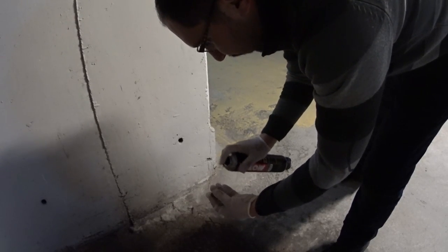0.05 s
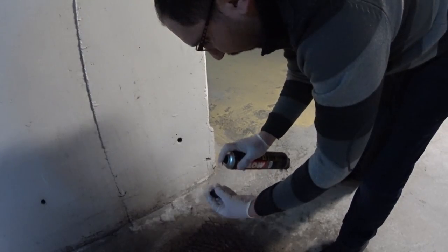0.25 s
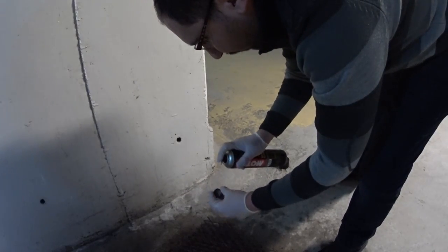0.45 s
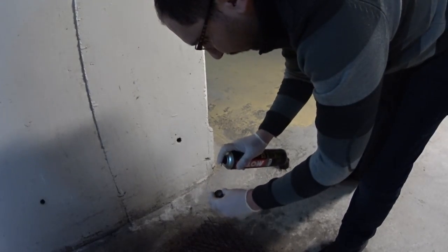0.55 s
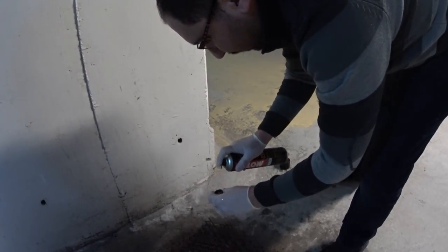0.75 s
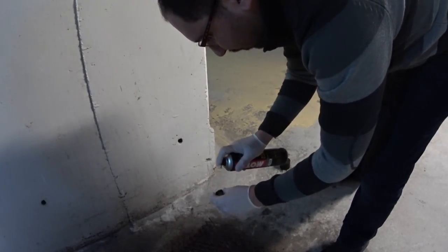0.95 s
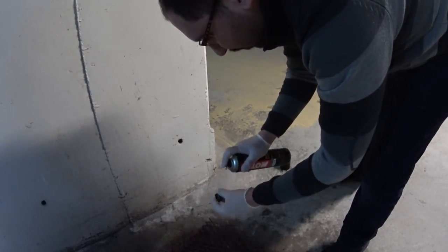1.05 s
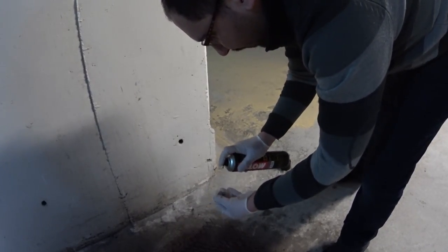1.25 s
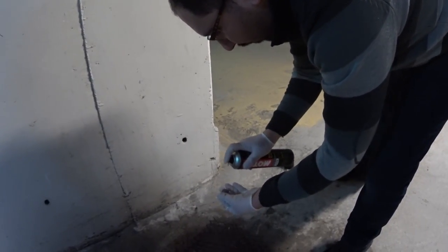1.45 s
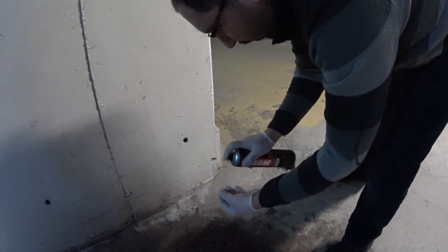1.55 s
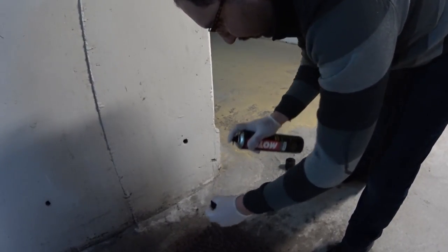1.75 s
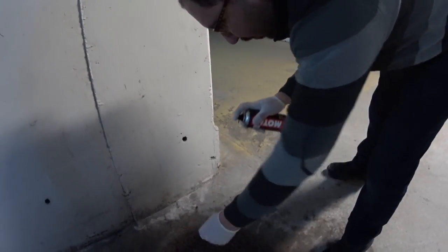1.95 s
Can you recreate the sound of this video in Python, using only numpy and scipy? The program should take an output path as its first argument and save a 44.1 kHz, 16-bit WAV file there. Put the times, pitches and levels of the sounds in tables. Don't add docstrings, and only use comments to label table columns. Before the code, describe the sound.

An aerosol can sprays a bright, sputtering hiss onto a small part, then shuts off abruptly

```python
import sys
import numpy as np
from scipy import signal
from scipy.fft import rfft, irfft, next_fast_len
from scipy.io import wavfile

SR = 44100
rng = np.random.default_rng(int(sys.argv[2]) if len(sys.argv) > 2 else 0)


def voltage_ratio(decibels):
    exponent = np.asarray(decibels, float) / 20
    return 10 ** exponent


def inscribe(sig):
    pcm = np.round(np.clip(np.atleast_2d(sig).T, -1, 1) * 32767)
    wavfile.write(sys.argv[1], SR, pcm.astype(np.int16))


N = 88200
RUN_IN = 44100

# columns pitch_hz, level_db (per Hz)
SPRAY_COLOUR = [(2000, -18.5), (3200, -3.5), (5800, -2), (8600, -4), (11000, -6), (13500, -9), (15700, -15)]


def at_hz(points, hz):
    p = np.array(points)
    return np.interp(np.log(np.maximum(hz, 1)), np.log(p[:, 0]), p[:, 1])


def scene_time():
    return (np.arange(N + RUN_IN) - RUN_IN) / SR


def in_time(rows):
    s, *columns = np.transpose(rows)
    t = scene_time()
    out = [np.interp(t, s, c) for c in columns]
    out[0] = out[0] - 45 * np.clip((t - s[-1]) / 0.033, 0, 1)
    return out


def rms_one(x):
    return x / np.sqrt(np.mean(x ** 2) + 1e-20)


def colour(x, points, slope_db=0):
    hz = np.maximum(np.fft.rfftfreq(x.shape[-1], 1 / SR), 1)
    octaves_below = np.maximum(np.log2(points[0][0] / hz), 0)
    octaves_above = np.maximum(np.log2(hz / points[-1][0]), 0)
    level_db = at_hz(points, hz) - slope_db * (octaves_below + octaves_above)
    return irfft(rfft(x) * voltage_ratio(level_db), x.shape[-1])


def resonance(x, hz, width_hz, state=None):
    r = np.exp(-np.pi * width_hz / SR)
    b = np.array([1, 0, -1]) * (1 - r * r) / 2
    a = [1, -2 * r * np.cos(2 * np.pi * hz / SR), r * r]
    if state is None:
        return signal.lfilter(b, a, x)
    return signal.lfilter(b, a, x, zi=state)


def drift(rate_hz):
    r = np.exp(-80 * np.pi * rate_hz / SR)
    white = rng.standard_normal((N + RUN_IN) // 40 + 2002)
    slow = signal.lfilter([1], [1, -2 * r, r * r], white)[2000:]
    return np.interp(np.arange(N + RUN_IN) / 40, np.arange(len(slow)), rms_one(slow))


def patchy(x, patchy_db, rate_hz):
    spec = rfft(x)
    third = np.log2(np.maximum(np.fft.rfftfreq(len(x), 1 / SR), 1) / 250) * 3
    third = np.clip(third, 0, 18)
    out = 0
    for k in range(19):
        part = irfft(spec * np.clip(1 - abs(third - k), 0, 1), len(x))
        out = out + part * voltage_ratio(patchy_db * drift(rate_hz))
    return out


def jet():
    # start_s, level_db
    flow = [
        (0, -44),
        (.05, -46),
        (.17, -46.5),
        (.52, -47.5),
        (1.0, -47),
        (1.39, -47.5),
        (1.52, -49.5),
        (1.555, -57.5),
    ]
    # pitch_hz, level_db (per Hz)
    jet_colour = [(335, -23.5), (365, -12), (715, -13), (950, -4.5), (1050, -9.5), (2100, -1.5), (3200, -7),
                  (6000, -7)]
    level_db, = in_time(flow)
    hiss = rms_one(colour(rng.standard_normal(N + RUN_IN), jet_colour, 17.3))
    return voltage_ratio(level_db - 1.54) * patchy(hiss, 1.0, 14.6)


def droplets(n):
    per_s, spread_db = 3000, 5
    sizes = voltage_ratio(spread_db * np.minimum(rng.exponential(1, n), 3.5)) * rng.choice([-1, 1], n)
    return rms_one(sizes * (rng.random(n) < per_s / SR))


def splash():
    # start_s, level_db, hollow pitch_hz, hollow strength_db
    strikes = [(0, -45.5, 6300, -14), (.124, -46.5, 5070, -3), (.24, -44, 5700, -9.5),
               (.32, -45.5, 5800, -6), (.39, -45, 5900, -5), (.46, -45, 6050, -7), (.6, -46, 6300, -6),
               (.7, -45.5, 4840, -14), (.8, -44.5, 4730, -13), (.9, -45.5, 6500, -12),
               (1.08, -46.5, 6500, -19), (1.2, -45, 7000, -6), (1.34, -45, 5760, -9),
               (1.45, -46.5, 6100, -0.5), (1.525, -44.5, 6160, -8), (1.553, -54, 6300, -22)]
    droplet_db, hollow_width_hz = -6.5, 1740
    level_db, hollow_hz, hollow_db = in_time(strikes)
    n = N + RUN_IN
    impacts = voltage_ratio(droplet_db) * droplets(n)
    hiss = rms_one(colour(rng.standard_normal(n) + impacts, SPRAY_COLOUR, 31))
    white, ring, state = rng.standard_normal(n), np.zeros(n), np.zeros((2, 2))
    for i in range(0, n, 128):
        once, state[0] = resonance(white[i:i + 128], hollow_hz[i], hollow_width_hz, state[0])
        ring[i:i + 128], state[1] = resonance(once, hollow_hz[i], hollow_width_hz, state[1])
    return voltage_ratio(level_db - 2.0) * patchy(hiss + voltage_ratio(hollow_db) * rms_one(ring), 1.6, 17.0)


def ringing_noise(white, hz, q):
    return rms_one(resonance(resonance(white, hz, hz / q), hz, hz / q))


def burst(s, length_s, hz, q):
    hiss_db = 1
    white, out = rng.standard_normal(16384), np.zeros(N + 2 * RUN_IN)
    hiss = voltage_ratio(hiss_db) * rms_one(colour(white, SPRAY_COLOUR, 12))
    t = (np.arange(16384) - 8192) / SR
    swell = np.exp(-.5 * (2.25 * t / length_s) ** 2)
    start = RUN_IN + int(s * SR) - 8192
    out[start:start + len(white)] = (ringing_noise(white, hz, q) + hiss) * swell
    return out[:N + RUN_IN]


def sputters():
    # start_s (the middle of the swell), length_s, level_db, pitch_hz, sharpness_q
    slugs = [(.005, 0.045, -57, 920, 1.2), (0.013, 0.042, -51, 7900, 1.5), (0.105, 0.075, -53.5, 5200, 4),
             (.255, 0.034, -49.5, 5900, 2.8), (0.419, 0.034, -46.5, 7060, 3), (0.76, 0.087, -53, 4720, 7),
             (1.081, 0.037, -50.5, 8500, 1.5), (1.144, 0.0253, -51, 5940, 1.9),
             (1.155, 0.075, -56.5, 3920, 19), (1.36, 0.12, -57, 4730, 9.9), (1.34, 0.045, -55, 5540, 6.0),
             (1.5, 0.067, -56.5, 3110, 6.0), (0.101, .06, -57, 4200, 12.0), (0.839, .05, -57, 3450, 8.0),
             (1.43, 0.078, -54, 7460, 5.0), (1.506, 0.038, -50, 6600, 2)]
    return sum(voltage_ratio(db) * burst(s, length_s, hz, q) for s, length_s, db, hz, q in slugs)


def shaded(x):
    # pitch_hz, width_hz, middle_s, length_s, share removed (0-1)
    shades = [(5400, 680, 0.81, 0.5, 0.46), (3000, 1300, 0.07, 0.17, 0.52), (6650, 700, 0.16, 0.17, 0.3),
              (3440, 1300, 0.62, 0.6, 0.3), (8500, 670, 0.78, 0.22, 0.2), (9900, 710, 0.84, 0.46, 0.07),
              (9300, 1000, 1.23, .15, 0.16), (3680, 250, 1.2, .5, .4), (1100, 350, .3, .2, .25),
              (350, 120, 1.3, .6, .3), (2500, 200, 1.2, .6, .3)]
    t = scene_time()
    for hz, width_hz, s, length_s, share in shades:
        cover = np.clip(share, 0, 1) * np.exp(-(2 * (t - s) / length_s) ** 2)
        x = x - cover * resonance(x, hz, width_hz)
    return x


def body(x):
    # pitch_hz, width_hz, boost_db
    resonances = [(365, 16, 1.5), (583, 81, 6), (878, 77, 4), (1248, 88, 7), (1723, 73, 5), (2340, 56, 1.5),
                  (2713, 90, 5.5), (3090, 110, 4), (3430, 110, 3), (3940, 70, 5), (4300, 64, 4),
                  (4740, 140, 4), (11130, 560, 3.5)]
    for hz, width_hz, db in resonances:
        x = x + (voltage_ratio(db) - 1) * resonance(x, hz, width_hz)
    return x


def cupped(x):
    # start_s, pitch_hz, width_hz, boost_db
    cup = [(0, 2080, 100, 10), (.12, 2070, 110, 7.5), (.23, 2110, 90, 9), (.37, 2120, 85, 10.5),
           (.5, 2110, 150, 5.5), (.63, 2120, 200, 5.5), (.75, 2200, 260, 7), (.85, 2120, 200, 4),
           (.95, 2200, 250, 5.5), (1.05, 2220, 330, 6), (1.14, 2110, 150, 9), (1.27, 2150, 200, 6.5),
           (1.38, 2170, 180, 11.5), (1.47, 2140, 200, 6), (1.55, 2100, 200, 6)]
    s, *columns = np.transpose(cup)
    hz, width_hz, db = [np.interp(scene_time(), s, c) for c in columns]
    ring, state = np.zeros(len(x)), np.zeros(2)
    for i in range(0, len(x), 128):
        ring[i:i + 128], state = resonance(x[i:i + 128], hz[i], max(width_hz[i], 30), state)
    return x + (voltage_ratio(db) - 1) * ring


def drops():
    # start_s, peak level_db, pitch_hz, fall_s (time to fall 30 dB)
    last_drops = [
        (1.571, -49.5, 7300, .006),
        (1.8605, -53.5, 5900, .007),
        (1.9682, -55.5, 8400, .004),
        (1.9700, -56, 8060, .005),
    ]
    sharpness_q, crack_db, rise_s = 9.0, -8, .0003
    out, t = np.zeros(N + 2 * RUN_IN), np.arange(2048) / SR
    for s, db, hz, fall_s in last_drops:
        white = rng.standard_normal(len(t))
        tone = ringing_noise(white, hz, sharpness_q)
        crack = voltage_ratio(crack_db) * rms_one(colour(white, SPRAY_COLOUR, 12))
        fade = voltage_ratio(db - 30 * t / fall_s) * np.clip(t / rise_s, 0, 1)
        out[RUN_IN + int(s * SR):][:len(t)] += (tone + crack) * fade
    return out[:N + RUN_IN]


def garage(x):
    # pitch_hz, t60_s
    decay = [(300, 0.1), (1000, 2.5), (2500, 1.5), (5000, 1.04), (9000, .5), (15000, 0.7)]
    # pitch_hz, level_db
    tail_level = [(300, -8), (1000, -5), (2000, -8), (3300, -7.5), (5000, -12), (9000, -14.5),
                  (15000, -16.5)]
    # pitch_hz, t60_s, level_db
    early = [(300, 0.17, -14.5), (3000, 0.13, -15), (7000, .16, -15.5), (12000, 0.08, -14)]
    # pitch_hz, level_db
    width = [(60, -20), (300, -7), (1000, -8), (3000, -11), (8000, -15), (15000, -15)]
    wall_gap_s = .004
    early_level = np.array(early)[:, ::2]
    t, size = np.arange(RUN_IN) / SR, next_fast_len(len(x) + RUN_IN)
    spec = rfft(rng.standard_normal((2, RUN_IN)))
    half_octave = np.log2(np.maximum(np.fft.rfftfreq(RUN_IN, 1 / SR), 1) / 200) * 2
    half_octave = np.clip(half_octave, 0, 13)
    echo = 0
    for k in range(14):
        hz = 200 * 2 ** (k / 2)
        fade = 0
        for levels, times in [(tail_level, decay), (early_level, early)]:
            db, t60_s = at_hz(levels, hz), at_hz(times, hz)
            unit_energy = np.sqrt(6 * np.log(10) / t60_s / SR)
            fade = fade + voltage_ratio(db - 60 * t / t60_s) * unit_energy
        band = irfft(spec * np.clip(1 - abs(half_octave - k), 0, 1), RUN_IN)
        echo = echo + band * fade * voltage_ratio([[0], [at_hz(width, hz)]])
    echo = echo * (t > wall_gap_s)
    mid, side = irfft(rfft(x, size) * rfft(echo, size), size)[:, RUN_IN:RUN_IN + N]
    return np.array([mid + side, mid - side])


def hum():
    # pitch_hz, level_db (per Hz)
    hum_colour = [(25, -27), (120, -19), (230, -7), (330, -11.5), (470, -5), (1100, -8.5), (4000, -14.5),
                  (15700, -28.5)]
    # pitch_hz, level_db
    hum_width = [(30, -30), (60, -21), (125, -22), (300, -6), (3000, -6), (9000, -10), (14000, -21)]
    hum_db = -65
    mid, side = rng.standard_normal((2, N))
    side = colour(side, hum_width)
    return voltage_ratio(hum_db) * rms_one(colour(np.array([mid + side, mid - side]), hum_colour, 6))


def scene():
    body_in_room, drop_room_db = .15, -12
    spray = jet() + splash() + sputters()
    ticks = drops()
    near = cupped(body(shaded(spray)))
    sent = spray + body_in_room * (near - spray) + voltage_ratio(drop_room_db) * ticks
    return garage(sent) + (near + ticks)[RUN_IN:] + hum()


def low_pass(x):
    return signal.sosfilt(signal.butter(12, 17040, fs=SR, output="sos"), x)


def record(dry):
    # pitch_hz, level_db
    lean = [(30, -1), (250, 0), (600, 1), (2000, 0.4), (4000, 0.37)]
    # pitch_hz, lead_radians
    lead = [(30, 0.0), (125, -0.045), (300, -0.32), (1210, -0.44), (4800, -0.2), (7500, -.12),
            (10500, -.13), (15000, -0.042)]
    cutoff_hz, open_s = 15740, .003
    size = next_fast_len(N + 4096)
    hz = np.fft.rfftfreq(size, 1 / SR)
    half = voltage_ratio(at_hz(lean, hz) / 2) * np.exp(1j * at_hz(lead, hz) / 2)
    top_cut = np.clip((cutoff_hz - hz) / 60, 0, 1)
    padded = np.hstack([dry[:, 2048:0:-1], dry])
    ports = rfft(padded, size) * np.array([half, 1 / half]) * top_cut
    opening = np.sin(np.pi / 2 * np.clip(np.arange(N) / SR / open_s, 0, 1)) ** 2
    mix = irfft(ports, size)[:, 2048:2048 + N] * opening
    return low_pass(mix)


dry = scene()
out = record(dry)
inscribe(out)
```